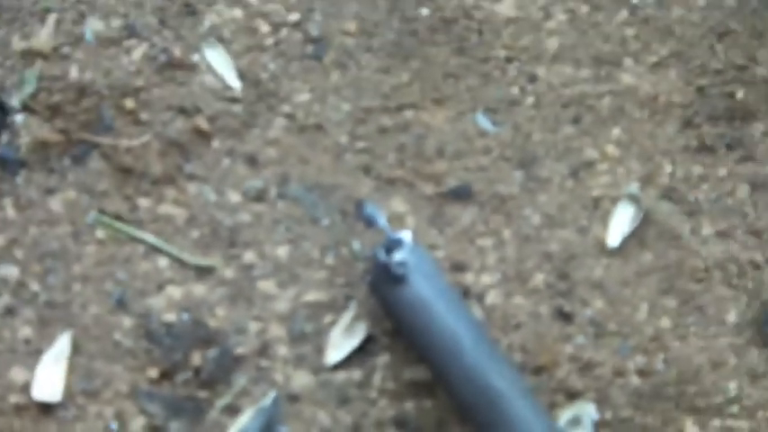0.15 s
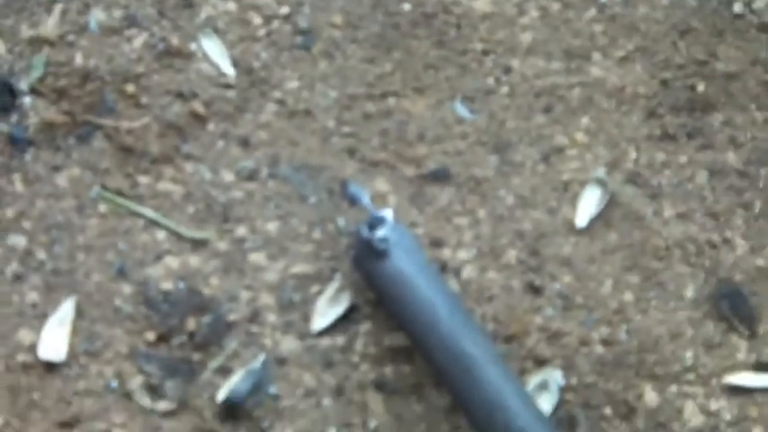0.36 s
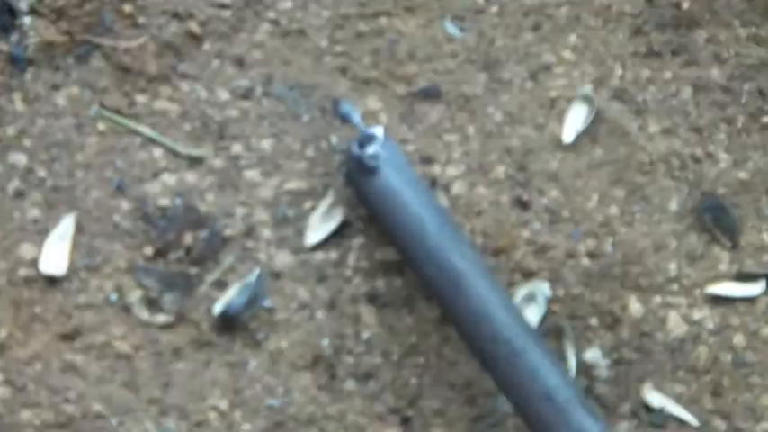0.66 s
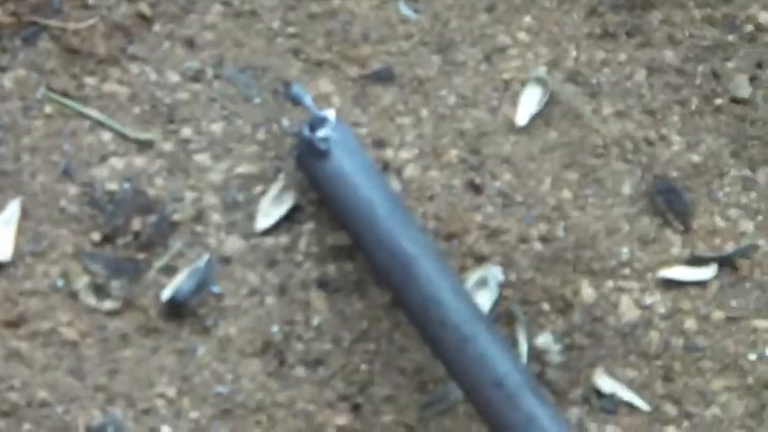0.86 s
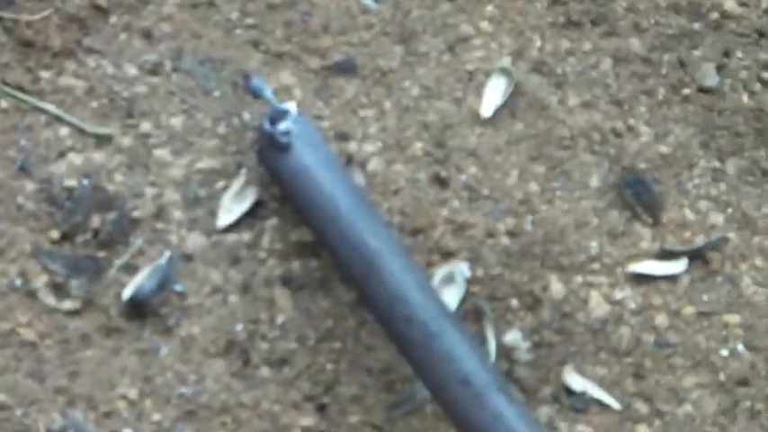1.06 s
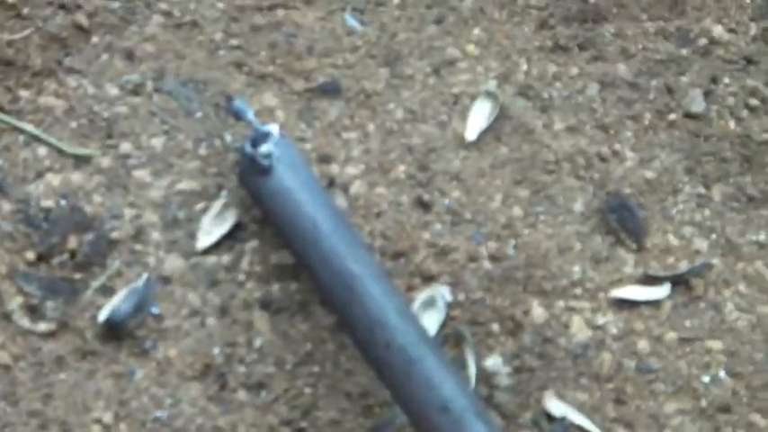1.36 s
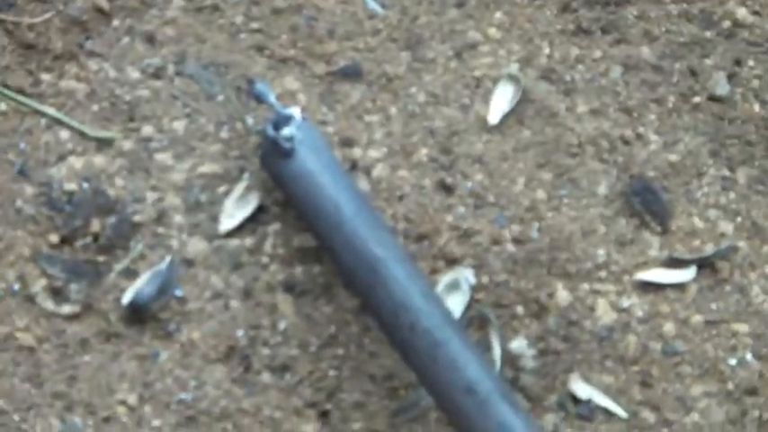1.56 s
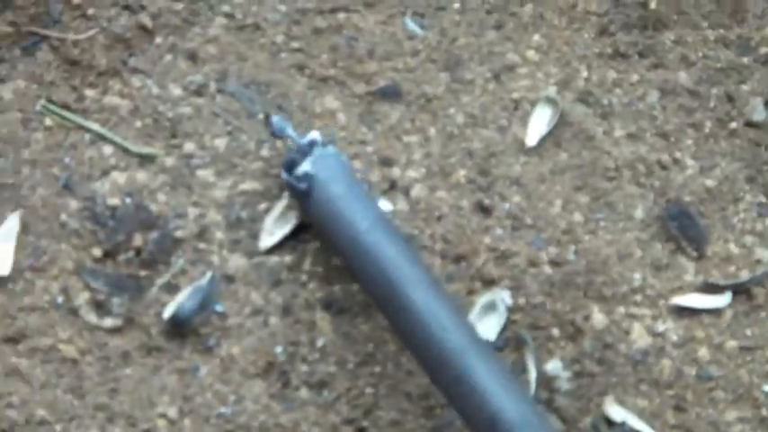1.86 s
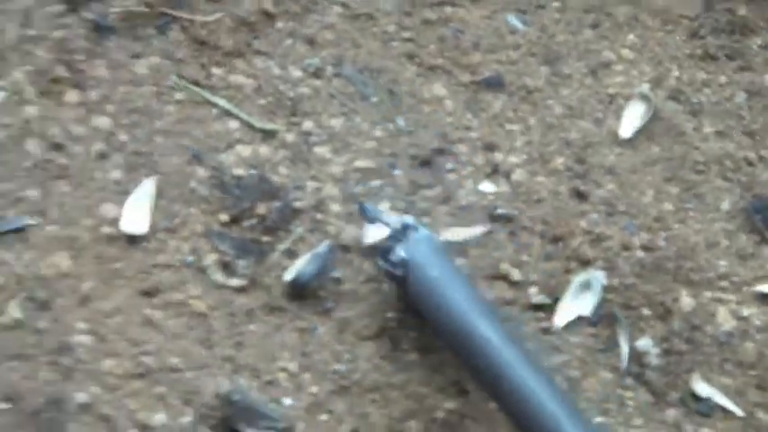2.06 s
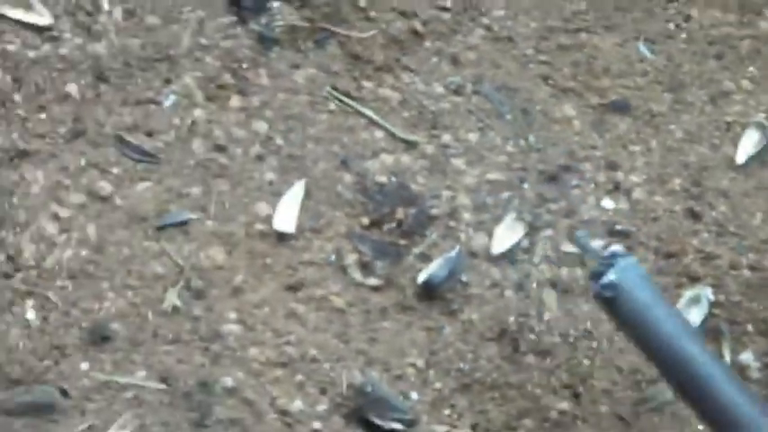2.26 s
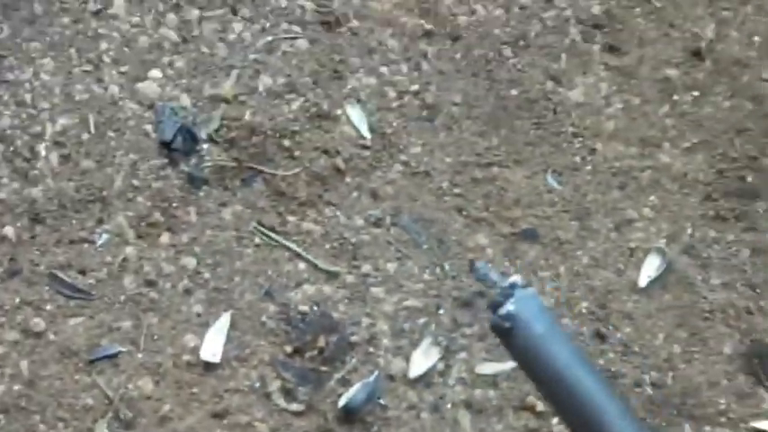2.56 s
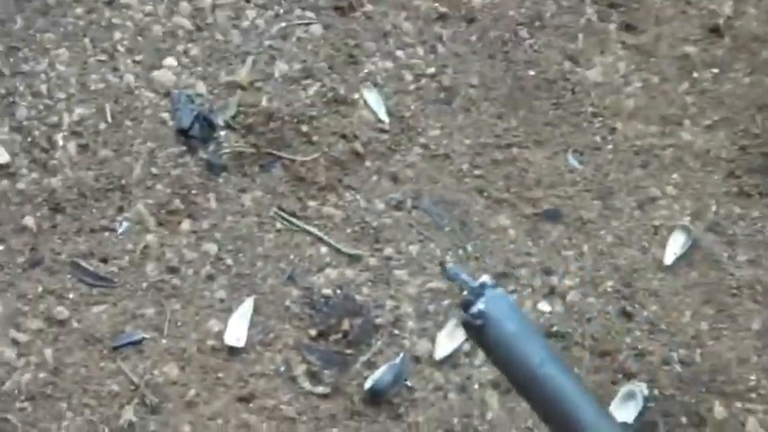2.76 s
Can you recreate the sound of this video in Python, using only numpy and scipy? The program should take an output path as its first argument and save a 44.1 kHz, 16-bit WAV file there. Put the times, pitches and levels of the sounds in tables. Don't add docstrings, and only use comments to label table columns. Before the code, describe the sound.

A steady furnace roar of forced air, hissing at pipe joints with a thin fan whistle, runs throughout outdoors; between half and just over one second, a tool thuds and scuffs gritty ground close to a stereo microphone.

```python
import sys
import numpy as np
from scipy import signal
from scipy.fft import rfft, irfft, next_fast_len
from scipy.io import wavfile
from scipy.ndimage import uniform_filter1d, map_coordinates

SR = 44100
rng = np.random.default_rng(int(sys.argv[2]) if len(sys.argv) > 2 else 0)


def bounce(signal):
    frames = np.transpose(np.atleast_2d(signal))
    limited = np.clip(frames, -1, 1)
    pcm = np.round(limited * 32767).astype(np.int16)
    wavfile.write(sys.argv[1], SR, pcm)


def elevation(decibels):
    levels = np.asarray(decibels, float)
    return 10 ** (levels / 20)


N = 127890

# start_s, level_db, rise_s, t60_s, ring_hz, ring_share (ratio to the noise)
SCUFFS = [(0.668, -16, 0.002, 0.05, 1450, 0.5), (.676, -17, .002, .04, 1500, .6),
          (.6876, -14, 0.0015, 0.04, 2490, 0.9), (0.705, -33, 0.003, 0.05, 1823, 3),
          (0.771, -15, 0.001, 0.025, 1550, 0.6), (0.8024, -8, .0007, 0.04, 2990, 0.35),
          (0.805, -17, 0.001, 0.03, 1480, 1.5), (.817, -17, 0.002, 0.045, 2600, 0.15),
          (.834, -20, .002, .04, 3000, .1), (.915, -20, 0.008, .1, 2150, 0.27),
          (.972, -21, .004, .07, 2100, .2), (.995, -17, .0015, .045, 2950, .3),
          (1.025, -18, .012, .16, 2000, .2)]
# freq_hz, density_db (per Hz)
GRIT_COLOUR = [(900, -43), (1400, -0.5), (3400, -3.5), (4600, -3), (6000, -9.5), (8000, -12), (12000, -15)]
# start_s, level_db, pitch_hz, low_push_db, t60_s
THUDS = [(0.557, -11.5, 245.5, -15, 0.17), (0.678, -5, 265, -24, 0.1), (0.725, -10.5, 212, -19, 0.12),
         (0.778, -16, 210, -34, 0.16), (.856, -6, 238.3, -21, 0.13), (0.904, -12.5, 274, -17, 0.17),
         (0.969, -17, 283.4, -15, 0.4), (1.084, -14, 274, -22, 0.12), (1.149, -10, 230.7, -27, 0.24),
         (1.16, -17.5, 174.3, -39, .55), (2.77, -20.5, 179.5, -28, 0.38)]
SHAFT_ORDERS = [1, 2, 4.34, 10, 14.19, 24.67]
# level_db (rms), phase_wander_rad
SHAFT_TONES = [(-42, .8), (-29, .8), (-38, 1.2), (-46, .9), (-52, 1.5), (-55, 1)]
# time_s, level_db
WHISTLE = [(0, -28), (.1, -25), (.18, -21.5), (.3, -22), (.36, -19), (.6, -21), (.8, -22), (1, -23),
           (1.1, -19.5), (1.22, -22), (1.35, -18.5), (1.8, -19), (2.2, -18.5), (2.6, -17.5), (2.9, -17)]
# time_s, level_db
FLOW = [(0, -16.5), (.05, -17), (.1, -21), (.2, -16.5), (.4, -18.5), (.52, -17.5), (.6, -19), (1.05, -20),
        (1.13, -19.5), (1.3, -20), (1.42, -16.5), (1.5, -19.5), (1.58, -18), (1.75, -20.5), (1.9, -17.5),
        (2.2, -18.5), (2.45, -19), (2.9, -19)]
# time_s, level_db
JET = [(0, -9.3), (.2, -6.5), (.5, -7), (.6, -8.5), (.9, -8), (1.02, -6.5), (1.22, -9), (1.4, -7.5),
       (1.9, -7), (2.2, -8.5), (2.6, -7.5), (2.9, -8)]
# freq_hz, density_db (per Hz)
ROAR_COLOUR = [(18, -90), (30, -72), (70, -38.5), (146, -15), (173, -14), (210, -11), (327, -4.5),
               (349, -2), (504, 3), (680, -16), (880, -51), (1500, -120)]
# pitch_hz, width_hz, level_db
PIPES = [(514, 58, 1.5), (728, 90, -1), (859, 131, -2.5), (990, 69, -1), (1261, 59, -9), (1588, 125, -14),
         (2600, 910, -20.5)]
# freq_hz, density_db (per Hz)
HISS_COLOUR = [(650, -23), (1100, -2), (1700, -9), (3550, -13.5), (3900, -16), (5400, -14.5), (11000, -25),
               (11700, -33.5), (12400, -70)]
# pitch_hz, width_hz, depth (0-1)
SIDE_BRANCHES = [(684, 10, 0.6), (590, 45, 0.2), (806, 14, 0.55), (204, 56, 0.25), (425, 30, .2),
                 (1330, 40, .25)]
# freq_hz, likeness (0-1)
ALIKE = [(100, 0.99), (700, 0.98), (1500, 0.91), (3000, 0.79), (6000, 0.54), (11000, 0.45)]
# freq_hz, level_db
LEFT_OVER_RIGHT = [(200, .45), (1000, .45), (2500, 0), (5500, -.8), (9000, -.4), (12000, .4)]


def unit(x):
    return x / np.sqrt(np.mean(x ** 2) + 1e-20)


def along(points, hz):
    f, v = np.transpose(points)
    return np.interp(np.log(hz + 1), np.log(f + 1), v)


def curve(rows):
    s, v = np.transpose(rows)
    return np.interp(np.arange(N) / SR, s, v)


def wobble(rate):
    return map_coordinates(rng.standard_normal(400), [np.arange(N) * rate / SR])


def filtered(x, response):
    m = next_fast_len(N + SR // 2)
    spectrum = rfft(x, m) * response(np.fft.rfftfreq(m, 1 / SR))
    return irfft(spectrum, m)[..., :N]


def rush(colour, patchy_db):
    z = signal.stft(rng.standard_normal((2, N)), nperseg=512)[2]
    patches = uniform_filter1d(rng.standard_normal(z.shape[1:]), size=8, axis=0)
    patches = uniform_filter1d(patches, size=12, axis=1)
    pair = signal.istft(z * elevation(patchy_db * unit(patches)), nperseg=512)[1][:, :N]

    def mid_side(hz):
        angle = np.arccos(np.clip(along(ALIKE, hz), -1, 1)) / 2
        return colour(hz) * np.array([np.cos(angle), np.sin(angle)])

    mid, side = filtered(pair, mid_side)
    return unit(np.array([mid + side, mid - side]))


def scuffs():
    out, t = np.zeros((2, N + SR)), np.arange(SR // 3) / SR
    ring_rough, ring_level, width = .5, 0.87, 0.23
    for s, db, rise, t60, hz, share in SCUFFS:
        grit = rng.standard_normal((2, len(t)))
        phase_walk = np.cumsum(rng.standard_normal(len(t))) / np.sqrt(SR / 300)
        ring = ring_level * np.sin(2 * np.pi * hz * t + ring_rough * phase_walk)
        burst = grit[0] + width * grit[1] * np.array([[1], [-1]]) + share * ring
        shape = elevation(db + 5 - 60 * t / t60) * (1 - np.exp(-t / rise))
        out[:, round(s * SR):][:, :len(t)] += shape * burst
    return filtered(out[:, :N], lambda hz: elevation(along(GRIT_COLOUR, hz)))


def thuds():
    out, t = np.zeros(N + SR), np.arange(SR // 2) / SR
    rise_s, push_hz, cut_hz, rough = 0.0086, 99, 99, .35
    push = np.sin(2 * np.pi * push_hz * t)
    for s, db, hz, push_db, t60 in THUDS:
        shape = elevation(-60 * t / t60) * (1 - np.exp(-t / rise_s))
        ring = np.sin(2 * np.pi * hz * t) + 0.56 * np.sin(2 * np.pi * 1.8 * hz * t)
        out[round(s * SR):][:len(t)] += elevation(db) * shape * (ring + elevation(push_db + 2.5) * push)
    rubbed = out[:N] * (1 + rough * wobble(90))
    return filtered(rubbed, lambda hz: (1j * hz / (cut_hz + 1j * hz)) ** 3)


def fan():
    shaft_hz, shaft_drift, blades = 178.72, .0003, 5
    whistle_swing_db, order_swing_db = 1, 3
    turn = 2 * np.pi * np.cumsum(shaft_hz * (1 + shaft_drift * wobble(3.3))) / SR
    jitter = .11 * wobble(25)
    whistle_db = curve(WHISTLE) + whistle_swing_db * wobble(21.12)
    tones = elevation(whistle_db) * np.sin(blades * turn + jitter)
    for order, (db, wander) in zip(SHAFT_ORDERS, SHAFT_TONES):
        level = elevation(db + order_swing_db * wobble(8.02))
        tones = tones + level * np.sin(order * turn + wander * wobble(15))
    return np.sqrt(2) * tones


def pipe_resonances(hz):
    total = 0
    for k, (centre, width, db) in enumerate(PIPES):
        damping = 1j * hz * width
        total = total + (-1) ** k * elevation(db) * damping / (centre ** 2 - hz ** 2 + damping)
    return total


def side_branches(hz):
    passed = np.ones_like(hz)
    for centre, width, depth in SIDE_BRANCHES:
        passed = passed * (1 - np.clip(depth, 0, 1) / (1 + ((hz - centre) / width) ** 2))
    return passed


def blast():
    roar_db, ring_db = 0.07, -1.63
    early_db, fade_s = 0.5, 0.82
    pipes_follow = .5
    flow_db = curve(FLOW)
    flutter_db = .4 * wobble(9) + .4 * wobble(22)
    roar = rush(lambda hz: elevation(along(ROAR_COLOUR, hz)), patchy_db=-1.0)
    pipes = rush(pipe_resonances, patchy_db=1.1)
    hiss = rush(lambda hz: elevation(along(HISS_COLOUR, hz)), patchy_db=0.3)
    hiss_db = flow_db.mean() + curve(JET) + 1.45 * flutter_db
    pipes_db = ring_db + early_db * np.exp(-np.arange(N) / SR / fade_s)
    pipes_db = pipes_db - (1 - pipes_follow) * (flow_db - flow_db.mean())
    driven = elevation(flow_db + flutter_db) * (elevation(roar_db) * roar + elevation(pipes_db) * pipes)
    return filtered(driven + elevation(hiss_db) * hiss, side_branches)


def scene():
    return scuffs() + thuds() + fan() + blast()


def top_cut(x):
    return signal.sosfilt(signal.butter(12, 12400, fs=SR, output="sos"), x)


def record(dry):
    bass_cut_hz, top_hz, lead_s = 70, 12450, -3.1e-5
    side = np.array([[1], [-1]]) / 2

    def ports(hz):
        band = (1j * hz / (bass_cut_hz + 1j * hz)) ** 2 * (hz < top_hz)
        level = elevation(side * along(LEFT_OVER_RIGHT, hz))
        return band * level * np.exp(2j * np.pi * hz * lead_s * side)

    return top_cut(filtered(dry, ports))


dry = scene()
out = record(dry)
bounce(out)
```